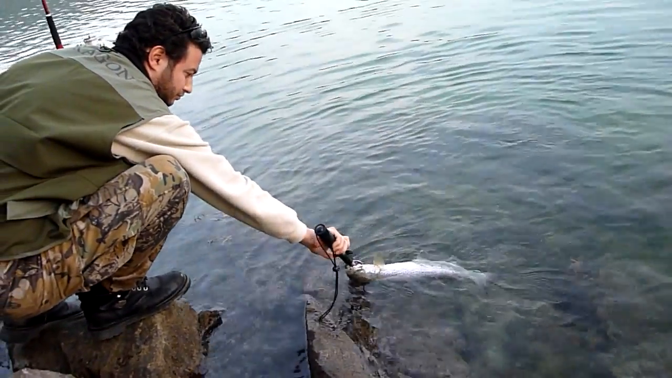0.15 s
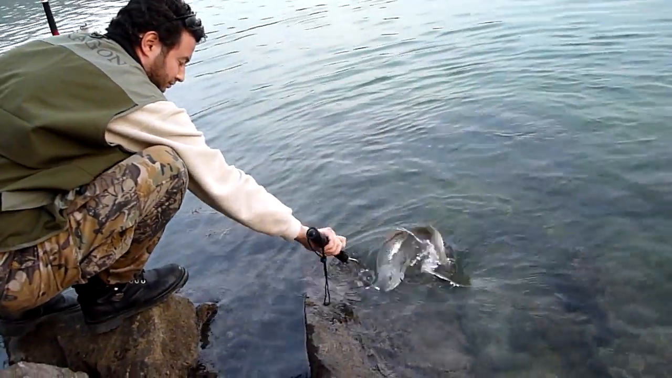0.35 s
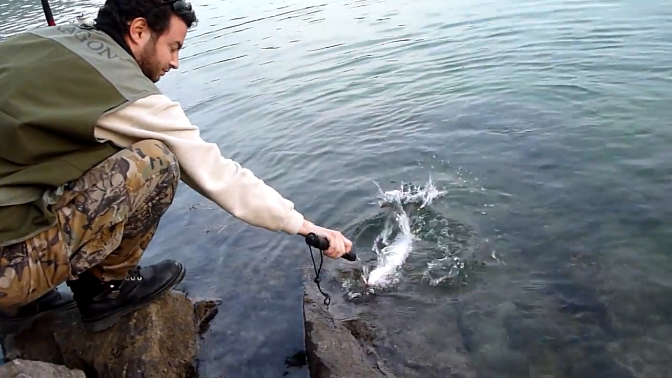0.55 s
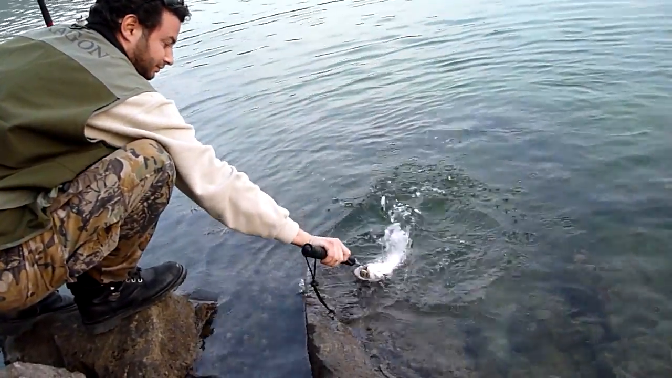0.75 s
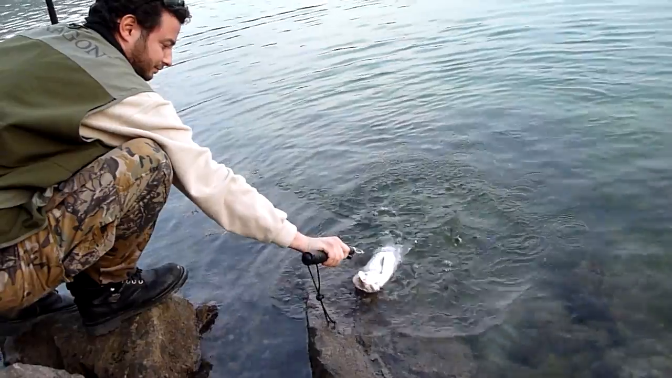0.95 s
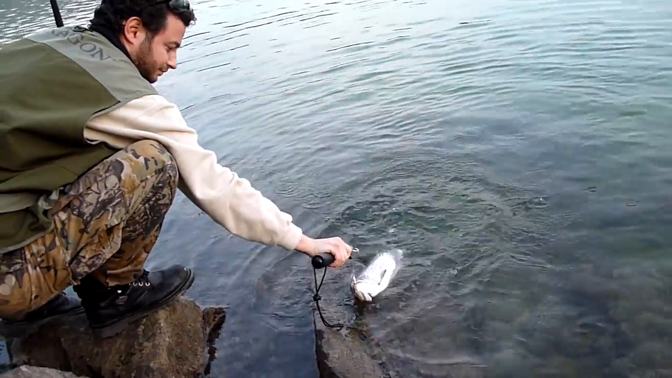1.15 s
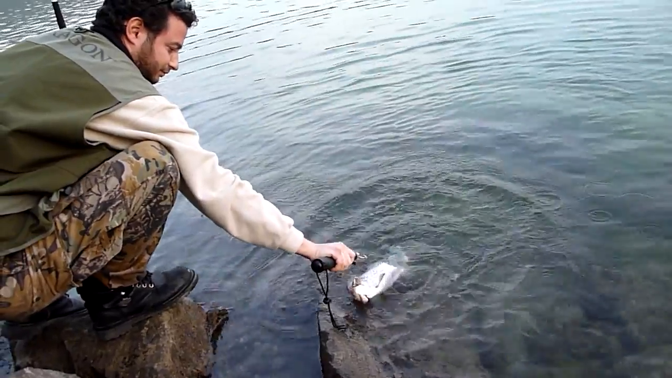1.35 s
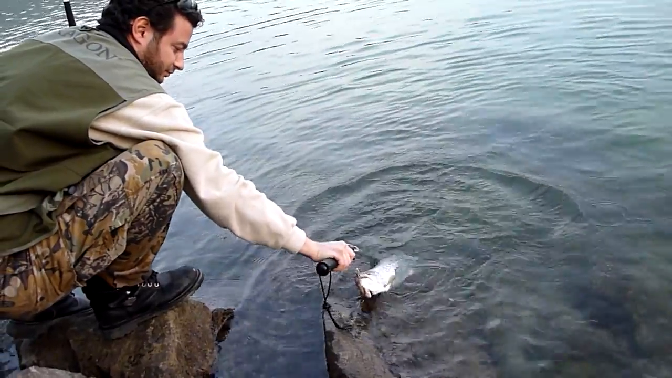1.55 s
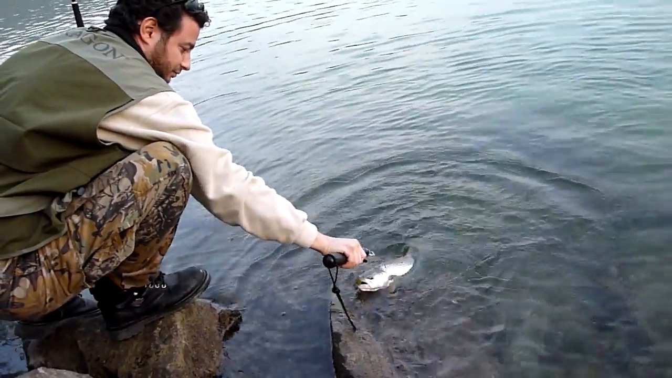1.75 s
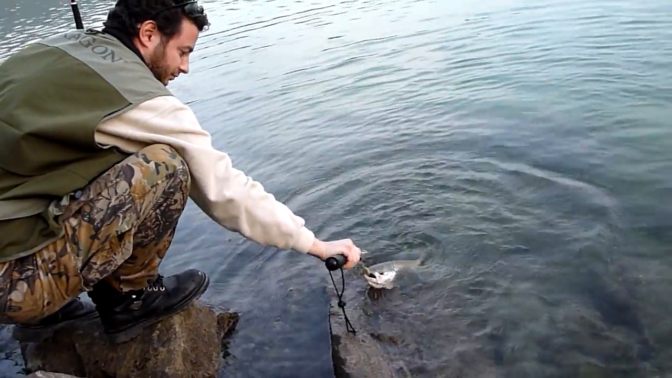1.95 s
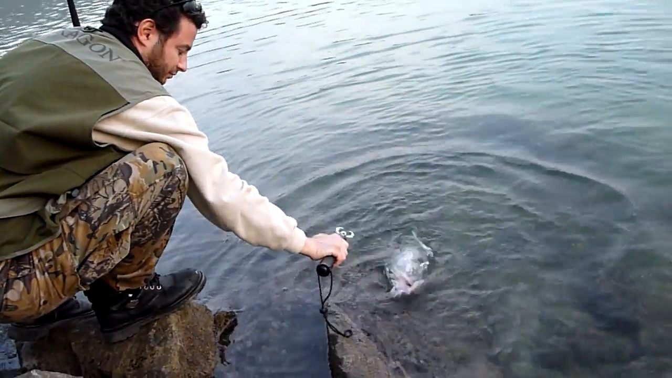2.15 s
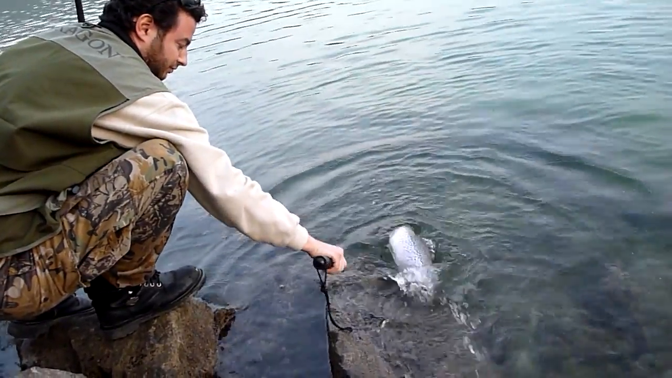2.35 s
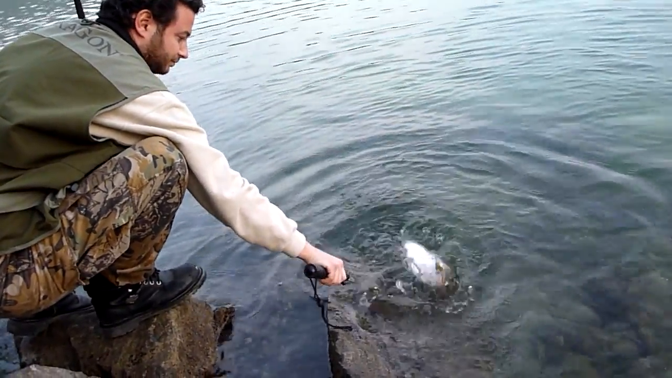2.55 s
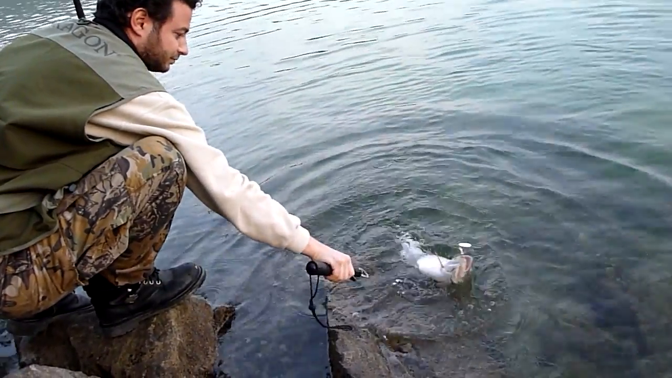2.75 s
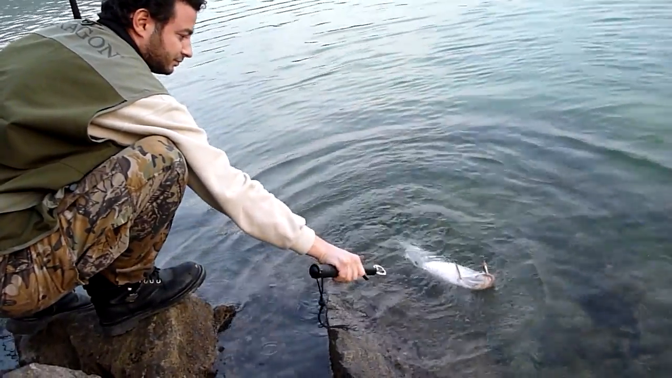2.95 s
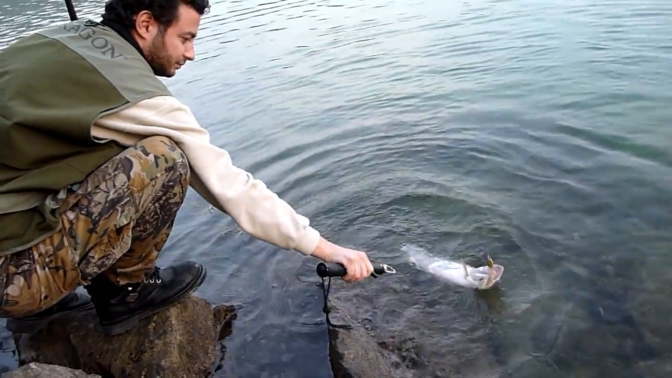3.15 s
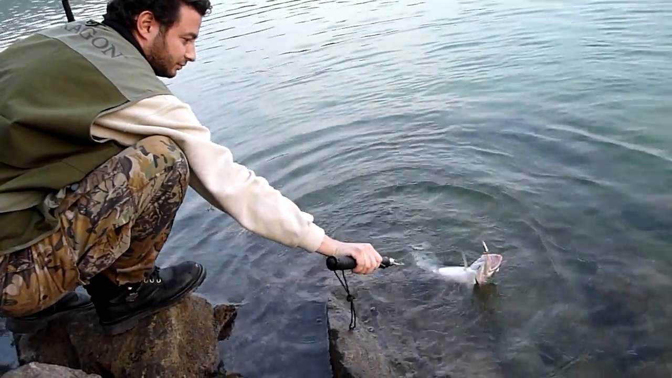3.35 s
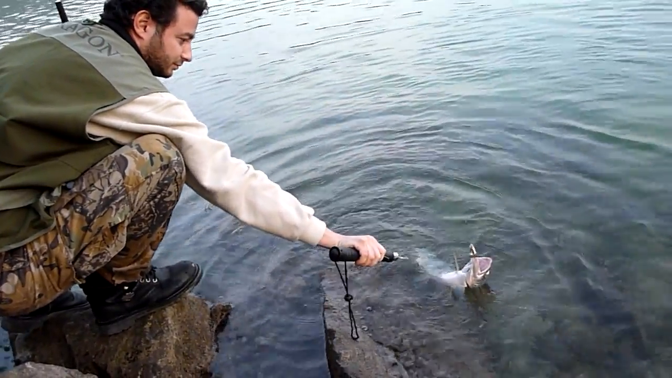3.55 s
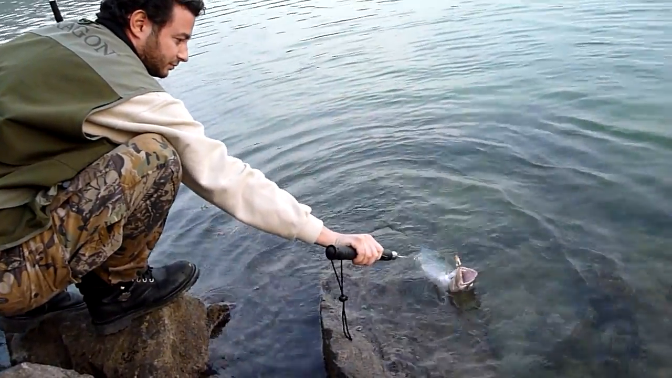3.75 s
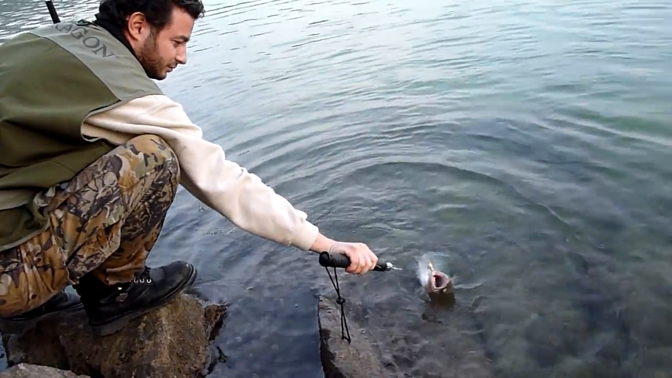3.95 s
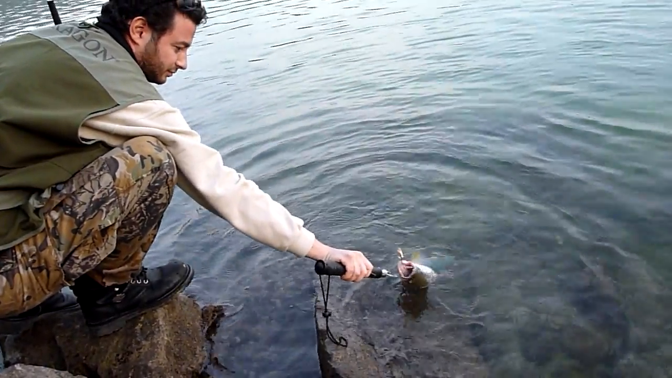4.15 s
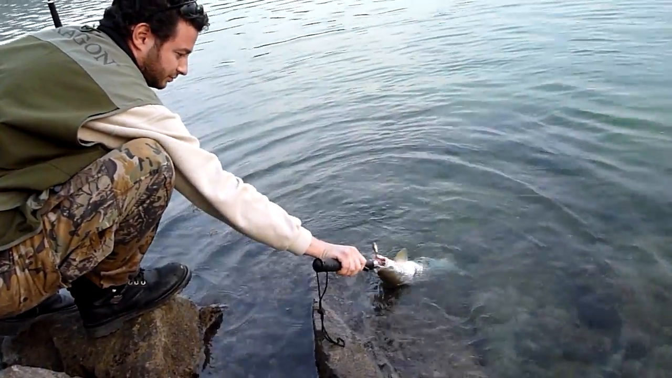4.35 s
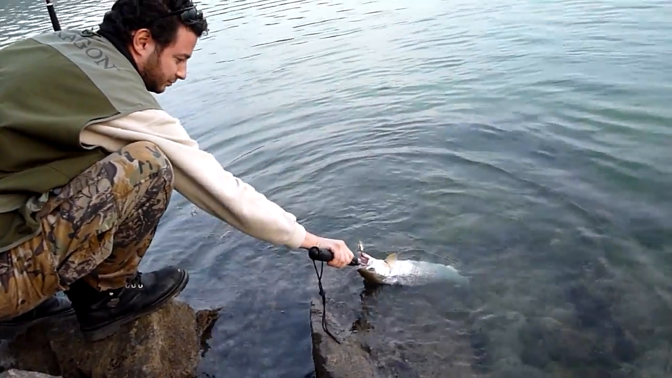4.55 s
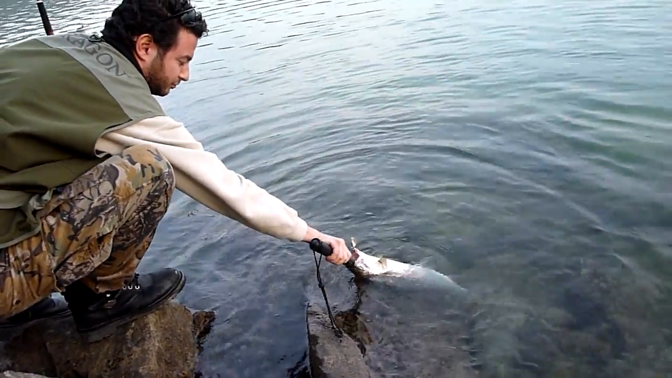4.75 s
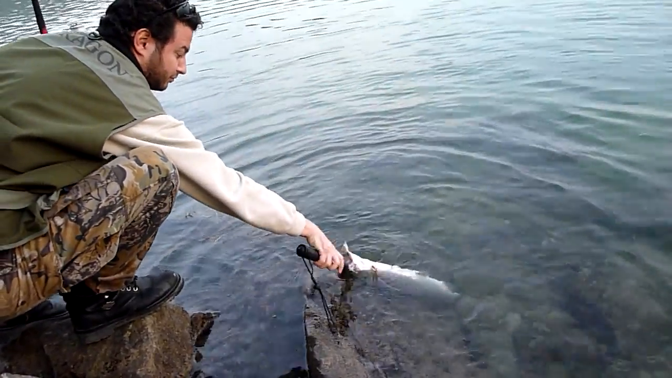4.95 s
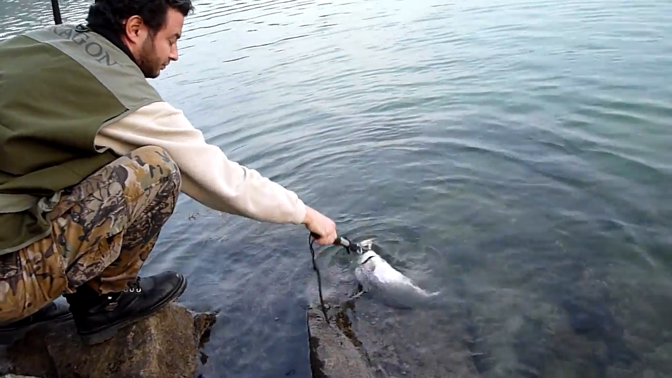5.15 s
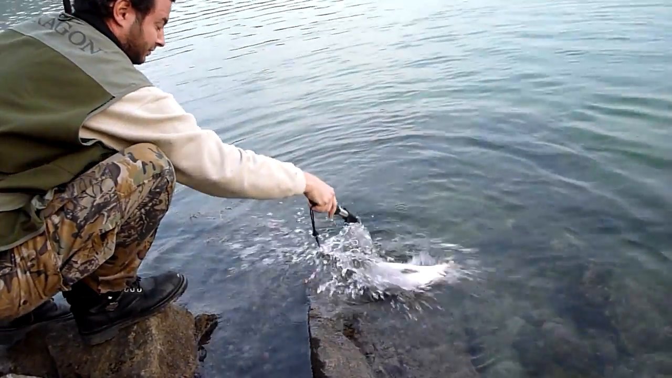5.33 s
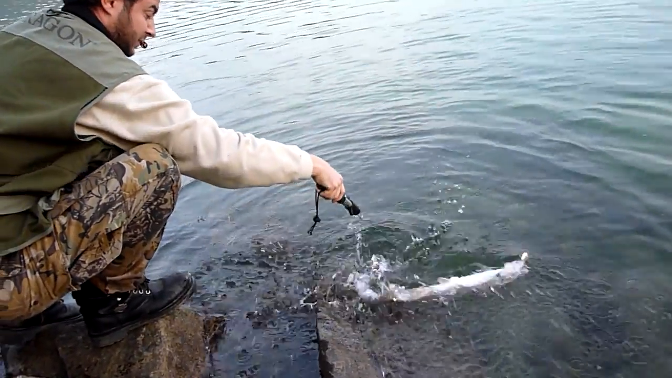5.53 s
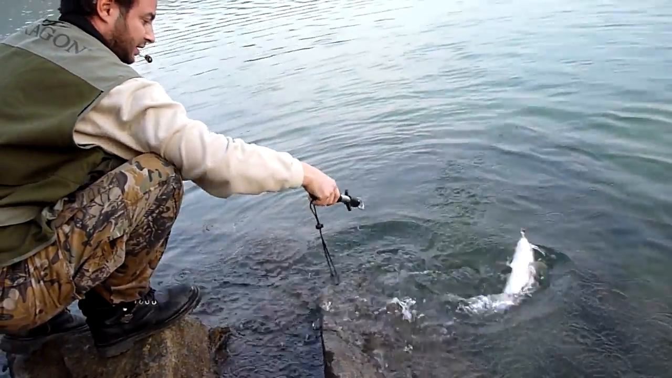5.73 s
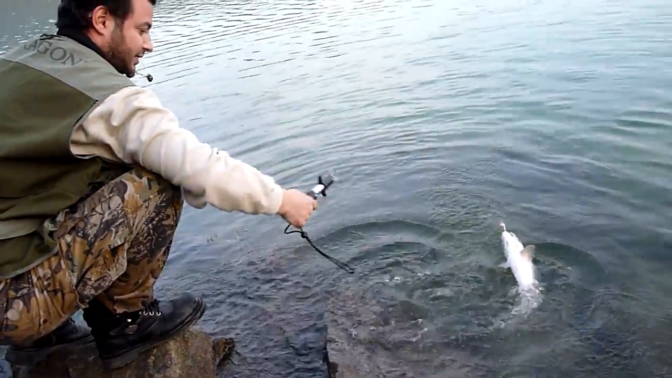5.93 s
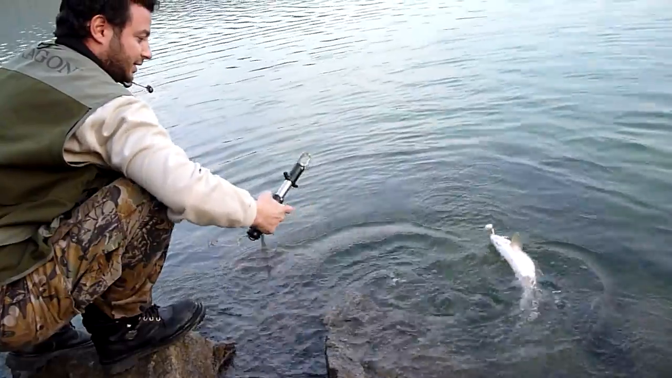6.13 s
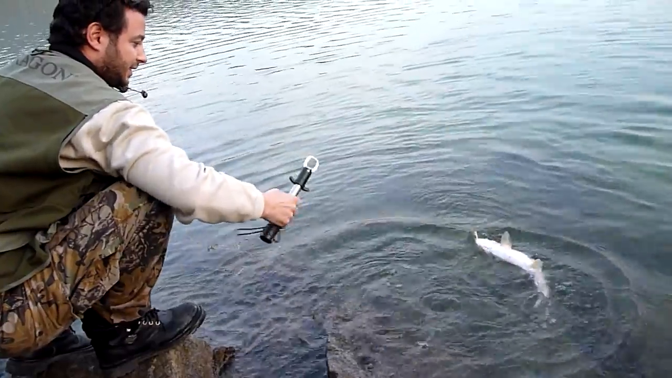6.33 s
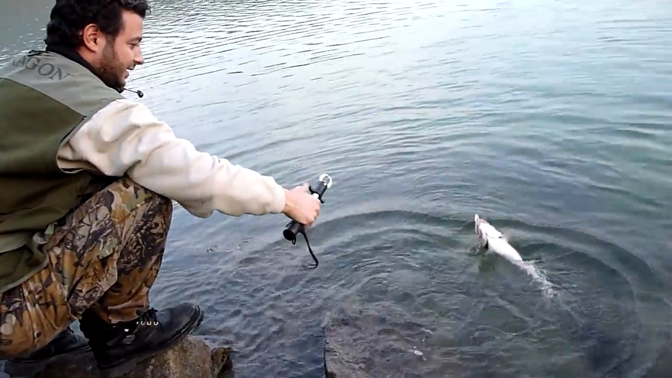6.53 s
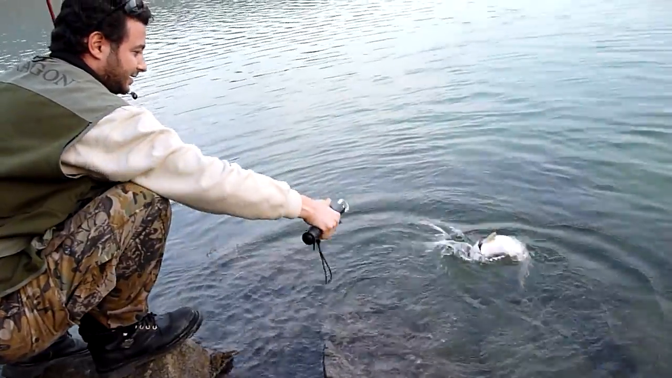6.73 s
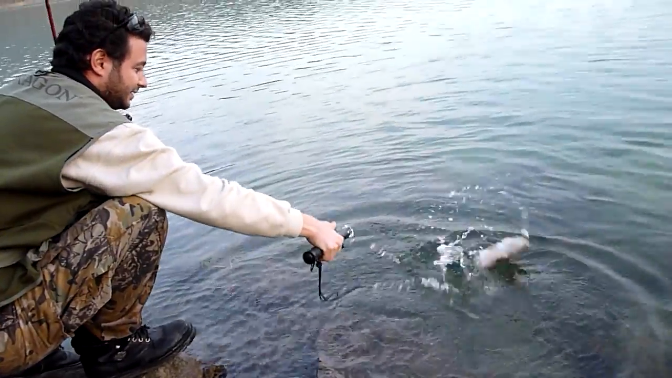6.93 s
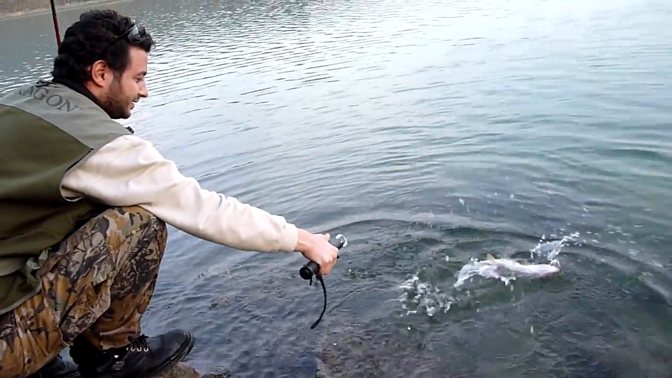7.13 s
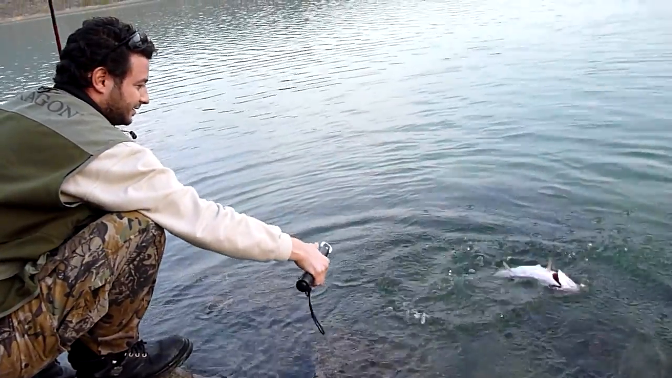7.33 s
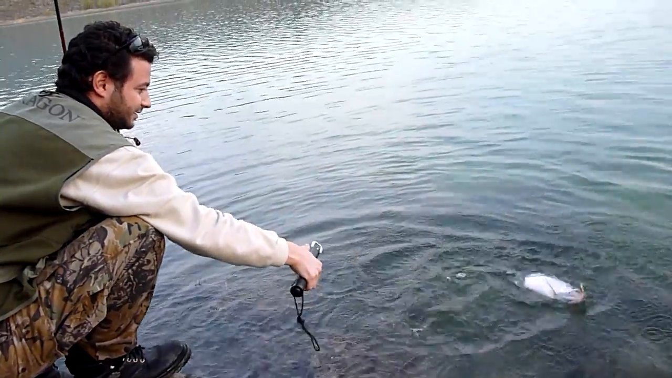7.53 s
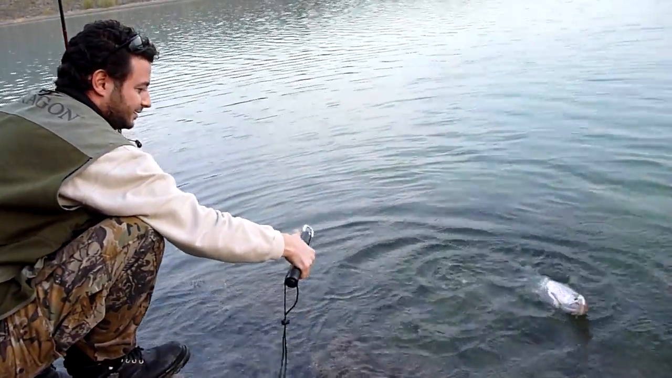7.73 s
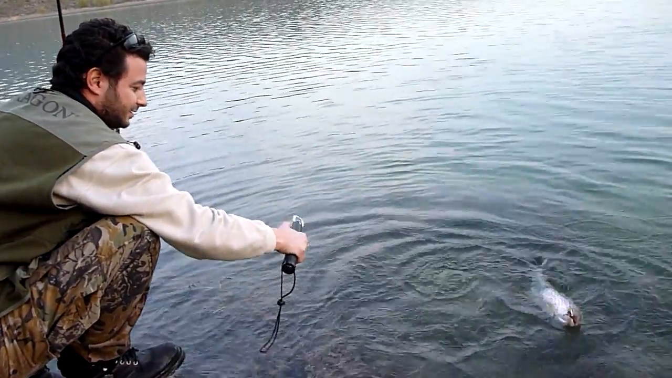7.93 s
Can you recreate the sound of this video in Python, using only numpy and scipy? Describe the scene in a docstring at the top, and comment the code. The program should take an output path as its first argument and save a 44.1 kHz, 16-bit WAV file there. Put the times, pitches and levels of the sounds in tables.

```python
"""A steady hush of river bank and microphone hiss is heard first, then the clinks of a steel lip gripper
as the fish it holds thrashes in four bouts at the shore. Slaps are bursts of filtered noise with a cavity
ring; bubbles, drips and thumps are decaying sines; churned water is a multitude of tiny rings, and the
gripper is a set of damped steel modes. A short scatter follows the near sounds, and gain control acts on all."""
import sys
import numpy as np
from scipy import signal
from scipy.io import wavfile
from scipy.ndimage import uniform_filter1d

SR = 44100
rng = np.random.default_rng(int(sys.argv[2]) if len(sys.argv) > 2 else 0)


def wrap_up_sound(samples):
    """Save the sound to the file named by the first command line argument, as 16-bit audio."""
    columns = np.atleast_2d(samples).T
    # keep every value between -1 and 1, then stretch to whole-number steps
    tamed = np.clip(columns, -1, 1)
    steps = np.round(tamed * 32767).astype(np.int16)
    wavfile.write(sys.argv[1], SR, steps)


N = 356328
EDGE_HZ = 15830  # upper limit of the sound path


def gain_of(db):
    """Level to amplitude: 20 dB is a factor of ten."""
    return 10 ** (np.asarray(db) / 20)


def evened(x):
    """Normalises the mean power, so that the rms is 1."""
    return x / np.sqrt(np.mean(x ** 2) + 1e-20)


def read(points, hz):
    """Interpolates a curve along a logarithmic frequency axis."""
    f, value = np.transpose(points)
    return np.interp(np.log(hz + 1), np.log(f + 1), value)


def add(mix, s, sound):
    """Superposes a sound on the mix from time s in seconds."""
    part = mix[round(s * SR):][:len(sound)]
    part += sound[:len(part)]


def band(x, lo_hz, hi_hz):
    """Band-pass filtering with gentle second-order slopes."""
    return signal.sosfilt(signal.butter(2, [lo_hz, hi_hz], "band", fs=SR, output="sos"), x)


def ring(db, hz, t60, rise, onset_s):
    """Damped oscillation: a sine dies by 60 dB in t60 seconds, its pitch gliding by exp(5 * rise)."""
    t = np.arange(round(t60 * SR)) / SR
    pitch_hz = hz * np.exp(rise * 5 * t / t60)
    phase = 2 * np.pi * np.cumsum(pitch_hz) / SR
    onset = 1 - np.exp(-t / onset_s)
    return gain_of(db - 60 * t / t60) * onset * np.sin(phase)


def hush():
    """Broadband stationary noise: random spectra give far water and microphone hiss, with thin camera tones."""
    # Spectrum of the hush. Each row: frequency in Hz, relative level in dB.
    hush_spectrum = [(15, -54), (25, -31), (48, -19.5), (113, -0.5), (447, -5), (652, -6), (788, -6.5),
                     (1090, -9), (2580, -13.5), (2870, -13.5), (4190, -16), (15700, -24.5)]
    # Faint steady tones of the camera. Each row: frequency in Hz, level in dB.
    whine = [(7800, -75), (15622, -77)]
    frames, hz = N // 256 + 5, np.fft.rfftfreq(1024, 1 / SR)
    real, imaginary, patches = rng.standard_normal((frames, 513, 3)).T
    # slight level patches, smooth in frequency and time
    patches = uniform_filter1d(uniform_filter1d(patches, 12, 0), 14, 1)
    level_db = read(hush_spectrum, hz)[:, None] + evened(patches)
    spectra = (real + 1j * imaginary) * gain_of(level_db)
    noise = signal.istft(spectra, nperseg=1024, noverlap=768)[1]
    t = np.arange(N) / SR
    tones = sum(np.sqrt(2) * gain_of(db) * np.sin(2 * np.pi * f * t) for f, db in whine)
    return gain_of(-46) * evened(noise[:N]) + tones


def clink(db, hz):
    """Modal vibration: the main ring is clean when low, scratchy when high; the gripper's other modes join."""
    # Modes of the gripper. Each row: frequency in Hz, level in dB relative to the clink, t60 in seconds.
    steel_modes = [(3770, -13.5, .04), (8330, -28, 0.068), (8940, -18, 0.025), (11990, -15, 0.1),
                   (12720, -20, 0.014), (14360, -12, 0.069)]
    t = np.arange(round(.3 * SR)) / SR
    out = np.zeros(len(t))
    t60 = read([(mode_hz, mode_t60) for mode_hz, _, mode_t60 in steel_modes], hz)
    scratch = np.clip((hz - 12500) / 600, .06, .8)  # clean in the long jaw, scratchy in small parts above it
    add(out, 0, (1 - scratch) * ring(db, hz, t60, 0, 0.00096))
    luck = rng.standard_normal((len(steel_modes), 2))
    for (mode_hz, mode_db, mode_t60), (db_luck, hz_luck) in zip(steel_modes, luck):
        add(out, 0, ring(db + mode_db + db_luck, mode_hz * (1 + 0.006 * hz_luck), mode_t60, 0, 0.00064))
    flutter = uniform_filter1d(uniform_filter1d(rng.standard_normal(len(t)), 50), 50)
    out *= 1 + 0.46 * evened(flutter)  # loose parts flutter
    rub, tick = rng.standard_normal((2, len(t)))
    rub_gain = gain_of(db - 1.0 - 60 * t / t60) * (1 - np.exp(-t / 0.0016))
    out += scratch * evened(band(rub, hz - 220, hz + 220)) * rub_gain
    return out + band(tick, 8800, 19000) * gain_of(db - 5 - 60 * t / 0.013)


def slap(s, db, hz, treble_db, t60=.025):
    """Impact on water: a crack of wide noise, a rough cavity ring and a spit of treble; returns start and sound."""
    t = np.arange(round(t60 * SR)) / SR
    rise_s = 2.6 * t60 ** 2  # long splats swell, short ones snap
    a, b, c = rng.standard_normal((3, 8000))[:, :len(t)]
    swell = (1 - np.exp(-t / rise_s)) ** 2 * gain_of(-60 * t / t60)
    crack = gain_of(-2.5) * evened(band(a, 890, 4150)) * swell
    spit = gain_of(treble_db + 5.5) * evened(band(b, 2700, 14100)) * swell
    spit *= gain_of(15 * t / t60)  # spray outlasts the blow
    rough = evened(band(c, hz / 1.12, hz * 1.137)) * swell
    out = crack + spit + rough
    add(out, rise_s, ring(-3.5, hz, 0.73 * t60, 0.016, 0.0011))
    add(out, rise_s, ring(6.5 - 350 * t60, 2720, 0.004, -0.13, .00005))  # the snap of first contact
    return s - rise_s, gain_of(db) * out


def churn_level_db():
    """Power addition of overlapping tail strokes: each builds fast and settles slowly."""
    # Tail strokes that stir the water. Each row: time of strongest churn in seconds, churn level in dB.
    strokes = [(.21, -42), (.32, -34), (.42, -51), (.5, -34), (.66, -36.5), (.74, -46), (.9, -52),
               (2.03, -51), (2.16, -38), (2.27, -38), (2.35, -58), (2.43, -45.5), (2.55, -39.5),
               (2.72, -51), (5.18, -33.5), (5.27, -38), (5.35, -34.5), (5.43, -38), (5.53, -30.5),
               (5.66, -36.5), (5.76, -50), (5.88, -50.5), (6.71, -38), (6.93, -37), (7.09, -35.5),
               (7.24, -42), (7.33, -43.5)]
    build_db_per_s, settle_db_per_s = 177, 89.5
    t = np.arange(0, N, 64) / SR
    power = np.full(len(t), 1e-12)
    for s, db in strokes:
        drop_db = np.maximum(build_db_per_s * (s - t), settle_db_per_s * (t - s))
        power = power + gain_of(db - drop_db) ** 2
    return np.interp(np.arange(N) / SR, t, 10 * np.log10(power))


def grains(spectrum, lo_hz, hi_hz, per_s, cycles, glide, spread_db, count):
    """Granular superposition: sparse random trains of tiny rings at many pitches, a few of them large."""
    out = np.zeros(N)
    clump = gain_of(2.2 * evened(uniform_filter1d(rng.standard_normal(N), 350)))  # grains swell in bunches
    for hz in np.geomspace(lo_hz, min(hi_hz, EDGE_HZ), count):
        when, sign, luck = rng.random((round(per_s / count * N / SR), 3)).T
        size_db = spread_db * np.minimum(-np.log(1 - luck), 4)
        train = np.zeros(N)
        train[(when * N).astype(int)] = np.sign(sign - .5) * gain_of(size_db)
        grain = ring(0, hz, 3.23 * cycles / hz, glide, 0.89 / hz)
        grain = grain / np.linalg.norm(grain) * np.sqrt(hz) * gain_of(read(spectrum, hz))
        out += signal.oaconvolve(train, grain)[:N]
    return evened(out * clump)


def churn():
    """Collective bubble resonance: fizz, scattered gurgles, ticking drops and fine spray follow the strokes."""
    # Spectrum of small bubbles. Each row: frequency in Hz, relative level in dB.
    fizz_spectrum = [(180, -36), (300, -8.5), (455, -5.5), (596, -3), (1340, 0), (1470, -4.5), (2920, -1.5),
                     (3880, -3), (5300, -11.5), (7500, -33), (9750, -55), (16500, -120)]
    # the two short spectra below have the same columns
    spray_spectrum = [(5000, -5), (9000, -1.5), (16000, 2.0)]
    drop_spectrum = [(1500, -6), (4000, 2.5), (7000, -9.5)]
    fizz = grains(fizz_spectrum, 342, 7460, per_s=9000., cycles=9.7, glide=0.074, spread_db=6.5, count=30)
    gurgle = grains(fizz_spectrum, 398.7, 3375, per_s=260., cycles=15.2, glide=.2, spread_db=6.5, count=24)
    spray = grains(spray_spectrum, 4600, 22500, per_s=2100.0, cycles=6.5, glide=0.038, spread_db=4.0, count=14)
    drops = grains(drop_spectrum, 1500, 7000, per_s=140., cycles=4.3, glide=0.098, spread_db=3.5, count=10)
    water = fizz + gain_of(-9) * drops + gain_of(-5.5) * gurgle + gain_of(-12.5) * spray
    return gain_of(churn_level_db()) * water


def drip(db, hz):
    """Drop impact: a tick of contact, then a brief rising plip."""
    out = ring(db, hz, .032, .08, .0006)
    add(out, 0, ring(db - 6, 3300, .003, -.18, .00005))
    return out


def bubble(db, hz, octaves_per_s):
    """Resonance, as of trapped air: low, gently born and gliding rings last longer, their level unsteady."""
    t60 = 0.047 * (1000 / hz) ** 0.7  # seconds, for a steady bubble at -27 dB
    t60 *= np.exp(-.07 * (db + 27)) * (1 + 0.041 * abs(octaves_per_s))
    tone = ring(db, hz, t60, octaves_per_s * np.log(2) * t60 / 5, .4 / hz)
    shake = uniform_filter1d(uniform_filter1d(rng.standard_normal(SR // 2), 220), 220)
    shake_db = 1.5 * evened(shake)[:len(tone)]  # moving water shakes a bubble
    return tone * gain_of(shake_db)


def smack(s, db):
    """Flat impact of fin or tail: a slap of short decay, hence a harder snap."""
    return slap(s, db, hz=3670, treble_db=-22.5, t60=.012)


def thump(db):
    """Low damped resonance as the body drops into the water."""
    return ring(db, 247, 0.046, .05, 0.00076)


def shore(x):
    """Scattering off rocks and the angler: convolution with sparse taps that die by 60 dB in 90 ms."""
    sign = rng.choice([-1., 1.], 4000)
    present = rng.random(4000) < .06
    taps = sign * present * gain_of(-60 * np.arange(4000) / SR / .09)
    taps[:60] = 0  # delay before the first reflection
    return signal.oaconvolve(x, taps / np.linalg.norm(taps))[:N]


def scene():
    """Linear superposition of gripper, water, their scatter and the background."""
    # Gripper parts knocking, among them one ring of a steel mode near 8.7 kHz. Each row: start in seconds,
    # level in dB, main ring in Hz.
    clinks = [(.053, -37, 13000), (.1984, -24, 14600), (.2122, -14, 13600), (.2205, -23, 13600),
              (.3986, -22.5, 14100), (.4768, -31, 14000), (1.6162, -26, 13400), (1.639, -37, 13500),
              (1.768, -33, 12200), (1.976, -33, 14500), (1.9899, -32, 14600), (2.0428, -36, 14200),
              (2.0857, -34, 14700), (2.136, -32, 15700), (2.1849, -36, 14600), (2.247, -33, 13700),
              (2.6105, -32, 12800), (2.653, -35, 14900), (2.836, -29, 13900), (4.687, -41, 14500),
              (4.7094, -32.5, 12200), (4.7631, -41, 14500), (4.9, -44, 14500), (4.9796, -29, 15100),
              (5.035, -36, 14700), (5.0524, -32, 15000), (5.125, -25, 12500), (5.1428, -25, 12300),
              (5.1594, -30, 14700), (5.1796, -31, 11500), (5.2066, -24, 12200), (5.2075, -12, 8750),
              (5.249, -23, 12230), (5.2856, -33, 12100), (5.518, -23, 13000), (5.955, -35, 12300),
              (6.123, -40, 15100), (6.256, -32, 12420), (6.5306, -44, 12200), (6.6882, -32, 14100),
              (7.2853, -35, 14300), (7.4873, -27.5, 12120), (7.539, -34.5, 12080), (7.81, -29.5, 14000),
              (7.8324, -38, 14400)]
    # Slaps and splats on the surface. Each row: time in seconds, level in dB, ring of the cavity in Hz,
    # relative treble in dB.
    slaps = [(.166, -31, 3600, -4), (.1884, -28.5, 3420, 0), (0.197, -21.5, 4020, -6),
             (0.221, -21.5, 4750, -3), (.2433, -31.5, 4010, 2), (.276, -25, 3400, -31),
             (0.2867, -18, 1420, -31), (0.3615, -16.5, 1660, -36), (.401, -13.5, 1740, -35),
             (.424, -22.5, 2390, -33), (0.4415, -21, 2790, -18), (.485, -19, 3530, -29),
             (0.4912, -18, 2460, -14), (.515, -16, 3470, -24), (.6447, -17, 1340, -39),
             (.6734, -25.5, 2140, -14), (.7328, -29, 2390, -24), (0.9085, -27, 3860, -19),
             (1.3848, -24.5, 4000, -14), (1.9577, -34, 3550, -7), (2.09, -27, 2550, -27),
             (2.099, -21, 2720, -29), (2.136, -18.5, 1280, -34), (2.1738, -19, 4470, -34),
             (2.2483, -20.5, 1540, -15.5), (2.255, -21, 1630, -23), (2.269, -25.5, 3700, -17),
             (2.2917, -28, 1640, -28), (2.366, -25, 2580, -28), (2.4204, -26, 1980, -21),
             (2.4923, -21.5, 2730, -32), (2.5292, -22.5, 2330, -29), (2.792, -28.5, 2570, -31),
             (4.616, -31.5, 3520, -6), (4.631, -28.5, 4770, -6), (4.6433, -31, 4170, -13),
             (4.732, -29, 3500, -15), (4.8587, -22, 4220, -17), (4.9282, -26, 2140, -28),
             (4.9829, -11.5, 4070, -20), (5.0884, -28.5, 2640, -7), (5.127, -17, 2140, -18),
             (5.142, -23, 3980, -9), (5.175, -17, 2440, -14), (5.1815, -14, 3240, -8.5),
             (5.1932, -12.5, 3000, -6), (5.2075, -10, 2590, 0.5), (5.223, -17, 4850, -13),
             (5.2688, -15.5, 3640, -32), (5.5195, -14.5, 2730, -17.5), (5.538, -18.5, 4150, -31),
             (5.6166, -21.5, 1450, -18), (5.701, -21.5, 3000, -32), (5.78, -18, 3110, -38),
             (6.6856, -19, 3750, -8.5), (6.7008, -23.5, 2100, -4.5), (6.719, -19.5, 3860, -11.5),
             (6.743, -22, 3280, -32), (6.8798, -27, 2100, -28), (6.919, -32, 3320, -24),
             (6.976, -19, 1600, -22), (7.0554, -25, 2520, -26), (7.1054, -17.5, 1260, -17),
             (7.1158, -16, 2690, -26), (7.1324, -18.5, 3800, -16), (7.164, -25, 3000, -28),
             (7.222, -22, 2280, -29), (7.3843, -26.5, 1380, -34)]
    # Single drops landing. Each row: start in seconds, level in dB, starting pitch in Hz.
    drips = [(.284, -23, 634), (.794, -28, 1105), (6.233, -31, 1050), (6.393, -30.5, 647),
             (6.521, -33, 3150), (6.556, -31, 3930), (6.575, -31, 2000), (6.879, -18, 1090),
             (7.303, -24, 920)]
    # Bubbles, and two faint steel plinks of the gripper near 3600 Hz.
    # Each row: start in seconds, level in dB, starting pitch in Hz, rise in octaves per second.
    bubbles_and_plinks = [(.31, -27, 442, 0), (.487, -34, 498, 1), (.622, -35, 898, 4),
                          (.646, -20, 445, 11.5), (.655, -21, 940, 1), (.68, -30, 917, -4),
                          (.724, -32.5, 1093, 1.5), (2.045, -32.5, 1290, -1), (2.093, -28, 855, 2),
                          (2.136, -11, 1464, 11), (2.178, -26, 1105, 1), (2.198, -33, 483, 1.5),
                          (2.202, -27, 834, -3), (2.209, -26, 1380, 1), (2.253, -29, 1580, 3),
                          (2.29, -25.5, 431, 10.5), (2.345, -21, 776, -3), (2.351, -36, 397, -1.5),
                          (2.423, -32, 458, 7.5), (2.445, -32.5, 1194, 20.5), (2.495, -42, 795, -0.5),
                          (2.535, -27.5, 1110, -4.5), (2.548, -40, 704, -4.5), (2.629, -32, 1506, -0.5),
                          (2.716, -36.5, 1110, 6), (5.128, -21, 2040, 0), (5.138, -27.5, 850, -0.5),
                          (5.171, -22, 930, 3), (5.349, -30, 1800, -3), (5.369, -29, 1195, 8),
                          (5.452, -29, 545, -2), (5.454, -23, 876, -6), (5.533, -16, 1080, 5),
                          (5.547, -29, 520, -6), (5.565, -33, 328, -0.5), (5.574, -25, 974, 3),
                          (5.61, -24, 347, -7), (5.736, -32.5, 847, 8), (5.805, -38, 556, 3.5),
                          (5.836, -35, 1480, 6.5), (5.869, -35.5, 427, 25.5), (5.911, -34, 1110, 9),
                          (6.256, -36, 3620, 0), (6.732, -28, 1156, -1), (6.783, -20.5, 657, 4),
                          (6.943, -29, 832, -10), (7.052, -23.5, 758, 1), (7.137, -34, 1530, 0),
                          (7.24, -32, 1187, -5), (7.812, -43, 3600, -1)]
    # Short flat smacks of fin or tail. Each row: time in seconds, level in dB.
    smacks = [(.312, -24), (.325, -31), (.339, -17.5), (.348, -29), (.5165, -14), (0.8616, -33),
              (2.3261, -27.5), (2.7075, -25.5), (2.717, -27), (5.312, -22), (5.325, -5.5), (6.9477, -15.5),
              (7.319, -32)]
    # The body drops into the water. Each row: start in seconds, level in dB.
    thumps = [(.338, -30), (.904, -30.5), (6.943, -31.5)]

    background = hush()
    near = churn()
    for s, *row in clinks:
        add(near, s, clink(*row))
    for row in slaps:
        add(near, *slap(*row))
    for s, *row in drips:
        add(near, s, drip(*row))
    for s, *row in bubbles_and_plinks:
        add(near, s, bubble(*row))
    for row in smacks:
        add(near, *smack(*row))
    for s, db in thumps:
        add(near, s, thump(db))
    return (near + gain_of(-10.5) * shore(near) + background)[None]


def record(dry):
    """Dynamic compression: loud splashes turn the level down and it recovers slowly; notches and a band limit."""
    # Narrow notch filters in the sound path. Each row: centre in Hz, width in Hz.
    notches = [(2890, 200), (7848, 120)]
    power_db = 10 * np.log10(abs(uniform_filter1d(dry[0] ** 2, 1500)) + 1e-12)
    fall_db = np.arange(N) * 2.0 / SR  # recovery at 2 dB a second
    held_db = np.maximum.accumulate(power_db + fall_db) - fall_db
    over_db = np.maximum(held_db + 26.0, 0)  # excess above -26 dB
    out = dry / gain_of(0.31 * uniform_filter1d(over_db, 600))
    for hz, width_hz in notches:
        out = signal.lfilter(*signal.iirnotch(hz, hz / width_hz, SR), out)
    low_pass = signal.firwin(1023, EDGE_HZ, window=("kaiser", 8), fs=SR)
    return signal.oaconvolve(out, low_pass[None], "same")


dry = scene()
out = record(dry)
wrap_up_sound(out)
```